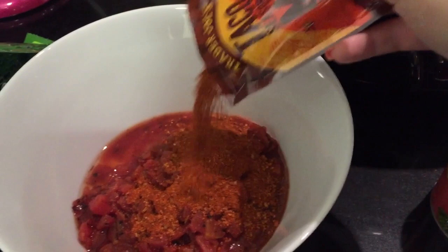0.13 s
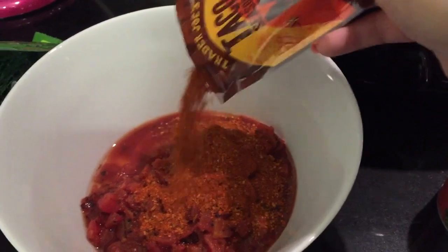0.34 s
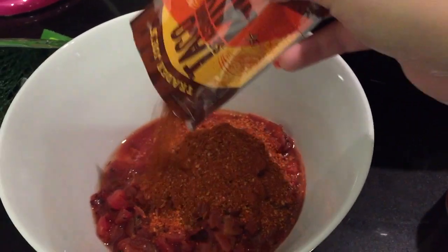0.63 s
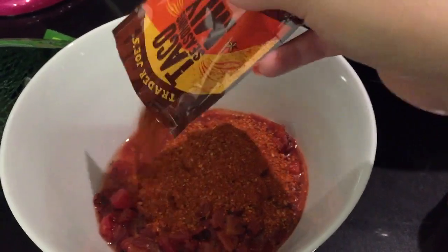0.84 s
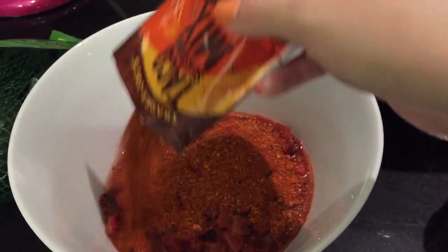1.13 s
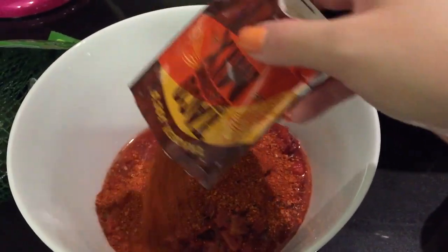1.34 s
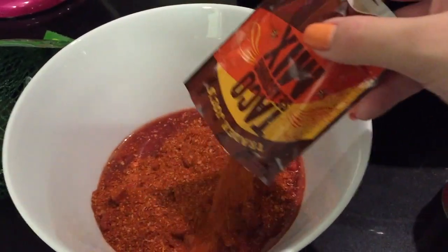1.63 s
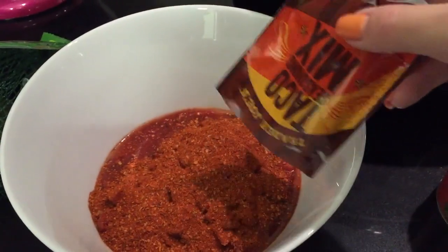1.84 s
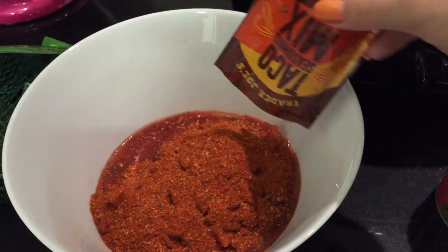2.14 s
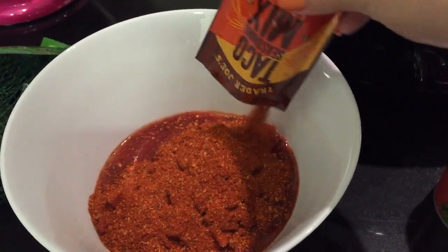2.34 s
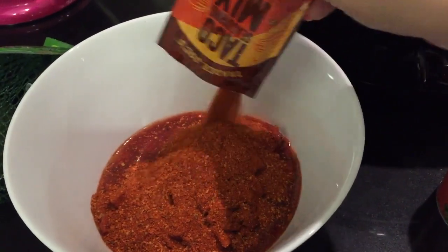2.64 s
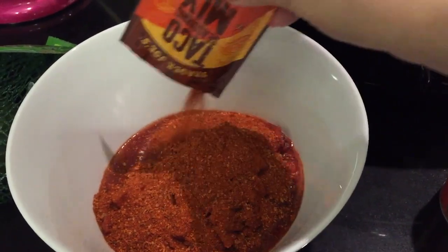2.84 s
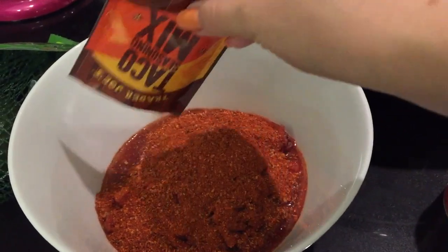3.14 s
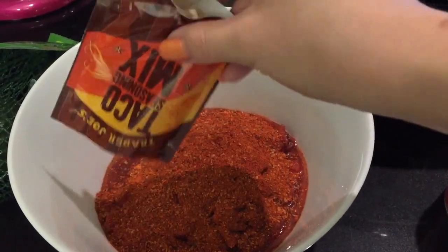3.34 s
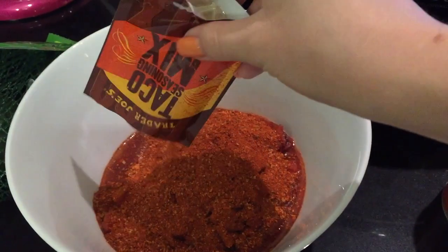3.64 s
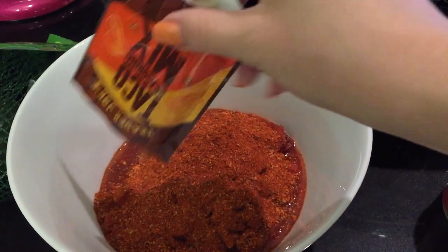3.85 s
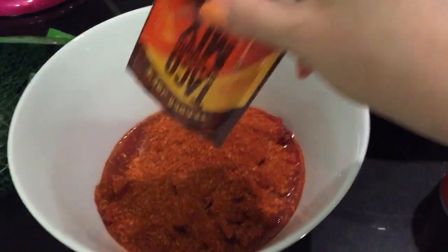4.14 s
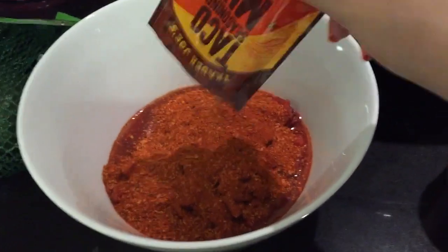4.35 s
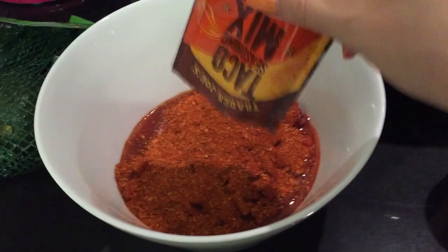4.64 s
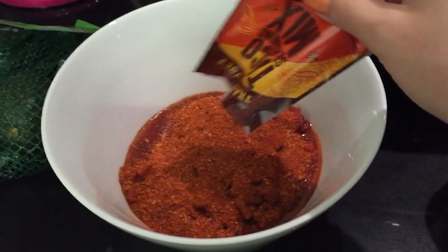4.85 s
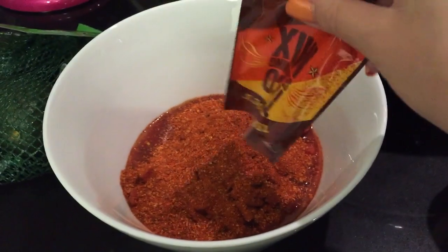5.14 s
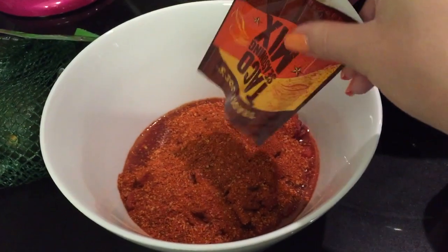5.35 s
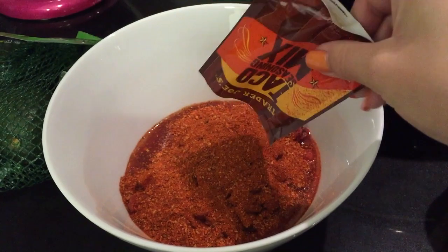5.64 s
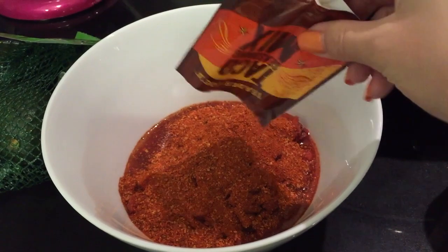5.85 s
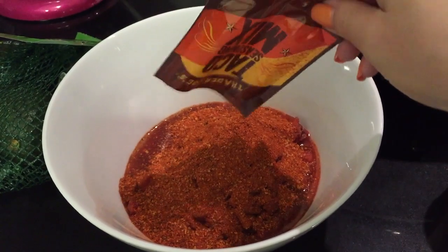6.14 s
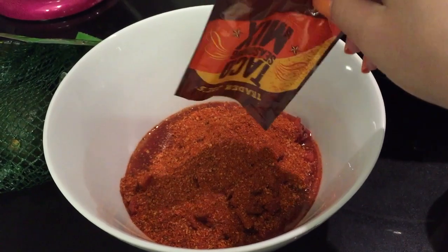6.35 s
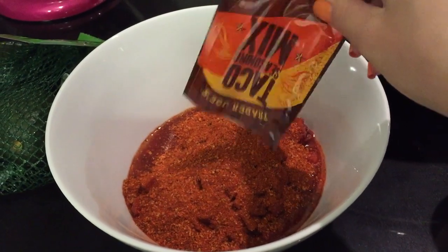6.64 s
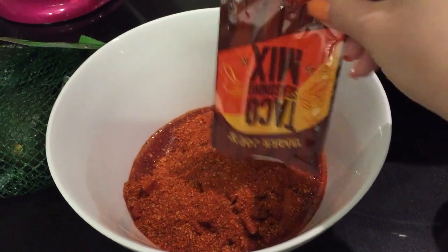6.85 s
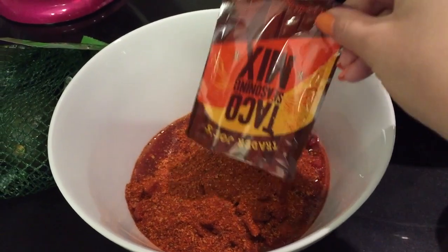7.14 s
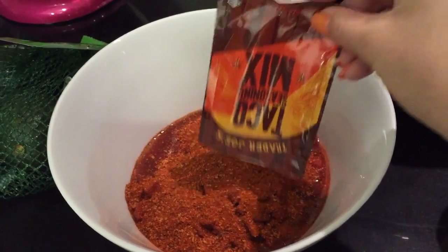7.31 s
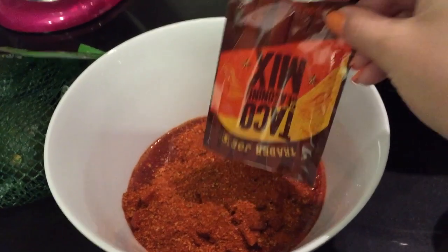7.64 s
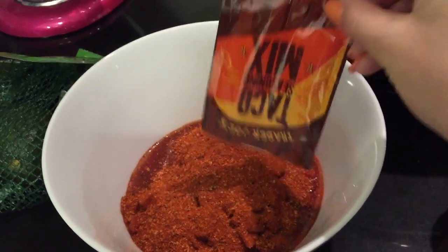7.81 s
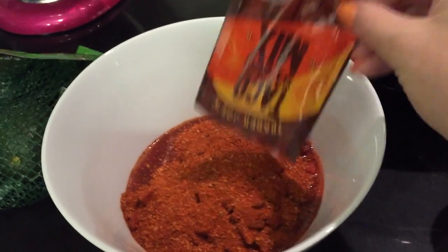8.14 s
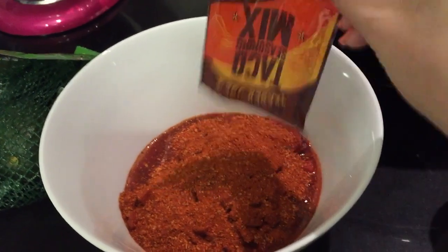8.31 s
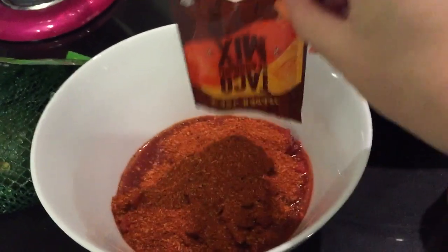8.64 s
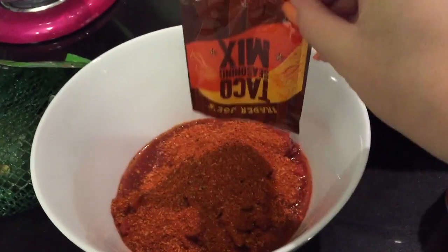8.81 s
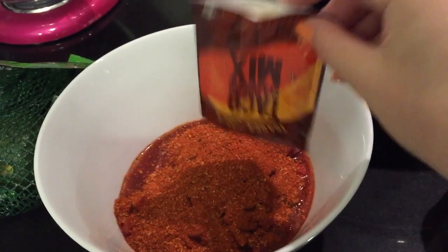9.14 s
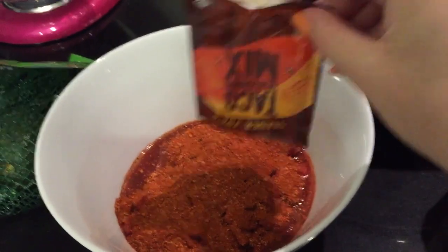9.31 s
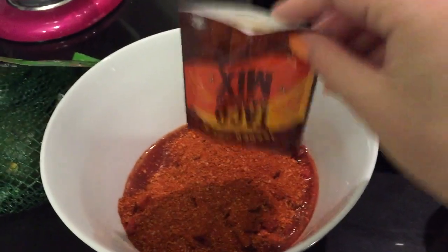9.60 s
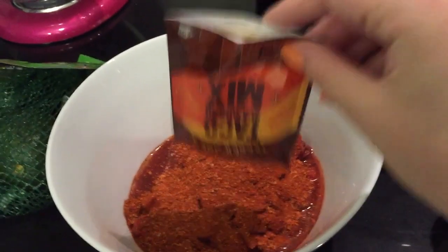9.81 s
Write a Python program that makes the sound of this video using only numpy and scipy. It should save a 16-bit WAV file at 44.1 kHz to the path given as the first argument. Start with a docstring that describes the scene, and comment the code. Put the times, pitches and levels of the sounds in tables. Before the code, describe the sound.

A close, dry kitchen sound over a continuous low, wavering appliance hum with soft air noise. From 0 to about 2.4 s, fine powder hisses out of a foil-lined pouch in short grainy pulses, each starting quickly and thinning, stronger near 1.1 and 2 s. Light film snaps enter around 2 s. At about 2.5 s two hard cracks and a hollow pop accompany the loudest, densest rush of powder, which fades by 3 s. Then only film is heard: crinkling and little ticks at 3 to 4.5 s, a dull snap near 4.05, sharp cracks at 4.9 and 5.0, and a strong cluster of crackles and pops at 5.5 to 5.8. More snaps come at 6.2, 6.4, 6.7 and 7.1 s. Soft low thuds fall near 4.6, 5.4 and 8.4 s. Sparse faint rustles and ticks continue to about 9.4 s, leaving mostly hum.

```python
"""Dry powder hisses in pulses, then in one long rush, over a steady hum; snaps break in from about two
seconds, around the rush; crinkles and ticks then carry on.
A foil-lined pouch of spice mix is shaken out over a china bowl in a small kitchen.
Powder is dense random grains shaped by its flow; film is resonant wrinkles and ringing creases.
Pouch sounds pass through reflections, bowl ring and room tail; a kitchen appliance hums behind."""
import sys
import numpy as np
from scipy import signal
from scipy.fft import rfft, irfft, next_fast_len
from scipy.io import wavfile
from scipy.ndimage import uniform_filter1d

SR = 44100
rng = np.random.default_rng(int(sys.argv[2]) if len(sys.argv) > 2 else 0)


def dump_mix(stems):
    """Bounce the given channels to the path in sys.argv[1] as a 16-bit WAV at rate SR."""
    frames = np.atleast_2d(stems).T  # one column per channel
    limited = np.clip(frames, -1, 1)  # hard clip at full scale
    pcm = np.round(limited * 32767).astype(np.int16)
    wavfile.write(sys.argv[1], SR, pcm)


N = 439677
TIME = np.arange(N) / SR
# spectrum of rustling film: (frequency [Hz], relative level [dB])
FILM_SPECTRUM = [(300, 0), (700, -2), (1300, -6), (2200, -0.5), (3200, 4.5), (4500, 3.5), (6500, -0.5),
                 (9000, -2), (10500, -6.5), (12500, -2.5), (15500, -8.5)]


def from_db(db):
    """Decibels to gain."""
    return 10 ** (np.asarray(db) / 20)


def rms_one(x):
    """Scale to unit rms."""
    return x / np.sqrt(np.mean(x ** 2) + 1e-20)


def at_hz(points, hz):
    """Read a table on a log-frequency axis."""
    f, value = np.transpose(points)
    return np.interp(np.log(hz), np.log(f), value)


def after(s):
    """Seconds since s, zero before it."""
    return np.maximum(TIME - s, 0)


def swell(middle_s, length_s):
    """A smooth bump of height 1, length_s from foot to foot."""
    return np.cos(np.pi * np.clip((TIME - middle_s) / length_s, -.5, .5)) ** 2


def drift(knots_per_s):
    """Random wander of unit rms, straight between random knots."""
    knots = rng.standard_normal(4000)
    return rms_one(np.interp(TIME * knots_per_s, np.arange(len(knots)), knots))


def colour(x, spectrum):
    """Causal minimum-phase filter with the given spectrum, built by folding its cepstrum."""
    size = 2 * next_fast_len(len(x) // 2 + 8192)
    hz = np.maximum(np.arange(size // 2 + 1) * SR / size, 1)
    cepstrum = irfft(np.log(from_db(at_hz(spectrum, hz))))
    cepstrum[1:size // 2] *= 2
    cepstrum[size // 2 + 1:] = 0
    return irfft(rfft(x, size) * np.exp(rfft(cepstrum)))[:len(x)]


def butter(x, order, edge_hz, kind):
    """Butterworth filter."""
    return signal.sosfilt(signal.butter(order, edge_hz, kind, fs=SR, output="sos"), x)


def band(x, low_hz, high_hz):
    """Butterworth band-pass."""
    return butter(x, 3, [low_hz, high_hz], "band")


def resonate(x, hz, width_hz):
    """One two-pole resonance, gain about 1 on top."""
    r = np.exp(-np.pi * width_hz / SR)
    numerator = np.array([1, 0, -1]) * (1 - r * r) / 2
    denominator = [1, -2 * r * np.cos(2 * np.pi * hz / SR), r * r]
    return signal.lfilter(numerator, denominator, x + 1e-18)


def grains(per_s, spread_db):
    """Random clicks of either sign and uneven size, mostly small."""
    sizes = from_db(spread_db * np.minimum(rng.exponential(1, N), 4))
    return (rng.random(N) < per_s / SR) * sizes * rng.choice([-1, 1], N)


def play(x, level_db, treble_db):
    """Give a texture its level in the mids and its brightness above them."""
    low = butter(x, 3, 5900, "low")
    high = butter(x, 3, 5900, "high")
    low = low / np.std(band(low, 2000, 5500))
    high = high / np.std(band(high, 6500, 15000))
    return from_db(level_db) * (low + from_db(treble_db) * high)


def shifting(x, depth_db, knots_per_s, count=22):
    """As the pouch changes shape, overlapping bands of its sound rise and sink, each on its own."""
    size = next_fast_len(N)
    spectrum = rfft(x, size)
    hz = np.arange(len(spectrum)) * SR / size
    place = np.interp(hz, np.geomspace(900, 15000, count), np.arange(count))
    out = 0
    for k in range(count):
        one_band = irfft(spectrum * np.maximum(1 - abs(place - k), 0), size)[:N]
        out = out + one_band * from_db(depth_db * drift(knots_per_s))
    return out


def flow_db():
    """Flow of powder: every slug starts quickly, thins out and stops; the final rush comes on top."""
    # each shake sends a slug down the film: (start [s], length [s], flow before powder_db [dB])
    shakes = [(0.0, 0.012, -70), (0.082, 0.098, -62), (0.27, 0.14, -59.5), (0.363, 0.051, -66),
              (0.501, 0.11, -60.5), (0.696, 0.12, -64), (0.889, 0.15, -60.5), (1.083, 0.11, -54),
              (1.263, 0.16, -56), (1.418, 0.098, -58.5), (1.563, 0.081, -61.5), (1.683, 0.07, -75),
              (1.977, 0.12, -56.5), (2.177, 0.12, -60.5), (2.264, 0.048, -57.5), (2.328, 0.032, -55.5),
              (2.436, 0.062, -43), (2.576, 0.069, -49.5)]
    attack_s, sag_db_per_s, release_db_per_s = 0.053, 58, 192
    slugs = 0
    for s, length_s, db in shakes:
        onset = np.sin(np.pi / 2 * np.minimum(after(s) / attack_s, 1)) ** 2
        sag_db = sag_db_per_s * after(s + attack_s)
        release_db = release_db_per_s * after(s + length_s)
        slugs = slugs + onset * from_db(db - sag_db - release_db)
    # tipped right over, the pouch lets the rest go: it swells, holds and runs dry
    rush_s, hold_s, rush_db = 2.503, 0.195, -48.5
    rise_db_per_s, fall_db_per_s = 116, 89
    rise_db = rise_db_per_s * np.maximum(rush_s - TIME, 0)
    fall_db = fall_db_per_s * after(rush_s + hold_s)
    rush = from_db(rush_db - rise_db - fall_db)
    return 20 * np.log10(np.hypot(slugs, rush) + 1e-9)


def powder():
    """Thousands of tiny grains and a few coarse flakes tick along the film and sound the air in the pouch."""
    # air inside the pouch: (frequency [Hz], width [Hz], gain [dB])
    pouch_air = [(1220, 140, 3.5), (1900, 710, -6), (3080, 310, 3.5)]
    # spectrum of sliding powder: (frequency [Hz], relative level [dB])
    powder_spectrum = [(300, -32), (600, -9.5), (1000, -6.5), (1600, 1), (2400, 1), (3100, 0.5), (4500, 0),
                       (6500, 1.5), (9000, 2), (10500, -2), (12500, -1.5), (15500, -6.5)]
    fine = rms_one(grains(per_s=8000, spread_db=1.5))
    coarse = rms_one(grains(per_s=400, spread_db=3.0))
    ticks = fine + from_db(-5.0) * coarse
    ticks = ticks * from_db(0.41 * drift(130) + 1.2 * drift(34.55))
    flakes = from_db(-4.0) * rms_one(grains(per_s=220, spread_db=2.0))
    drive = 0.75 * ticks + flakes
    hollow = sum(from_db(db) * resonate(drive, hz, width) for hz, width, db in pouch_air)
    sound = shifting(colour(ticks + hollow, powder_spectrum), depth_db=2.5, knots_per_s=40)

    level_db = flow_db()
    # the finest dust runs ahead of each slug, so it starts bright
    fines_lead_s = 0.0072
    fines_db = np.interp(TIME + fines_lead_s, TIME, level_db)
    # a thin trickle is brighter than a thick flow
    trickle_db, trickle_treble_db, treble_db_per_db = -71.5, -2, -0.1
    trickle_tilt_db = trickle_treble_db + treble_db_per_db * (fines_db - trickle_db)
    treble_db = fines_db - level_db + trickle_tilt_db
    # a thick flow lies on the film and damps its low notes
    thick_db, thick_damping, thick_edge_hz = -58, 0.57, 1300
    thickness = np.minimum(from_db(level_db - thick_db), 1)
    lows = butter(sound, 1, thick_edge_hz, "low")
    return play(sound - thick_damping * thickness * lows, level_db, treble_db)


def appliance(waver_db=3.0, phase_waver_rad=0.69, drone_waver_db=3.0, wander_db=0.6):
    """Wavering motor hum, over air noise whose lows and resonances slowly rise and sink."""
    # mains hum: (frequency [Hz], rms level before waver [dB])
    hum_tones = [(59.2, -70.5), (118.8, -59.5), (236.9, -66.5)]
    # room and casing resonances: (frequency [Hz], width [Hz], level before waver and colouring [dB])
    drone_modes = [(55.5, 11, -73), (83.5, 7, -66), (204.2, 7.3, -66), (297.7, 20, -70.5), (400, 33, -80),
                   (455.5, 26, -75), (905.7, 26, -74.5), (1308, 50, -79.5)]
    # air noise spectrum: (frequency [Hz], relative level [dB])
    air_spectrum = [(22, -16.5), (40, -7.5), (58, 4.5), (72, 0.5), (100, 2.5), (140, -7), (175, -9),
                    (222, 3), (265, -6.5), (320, -6.5), (400, -21.5), (600, -21), (950, -20.5), (1200, -27),
                    (2000, -26.5), (3000, -32.5), (6000, -38.5), (15000, -48)]
    air_db = -56.5
    hum = 0
    for hz, db in hum_tones:
        phase = 2 * np.pi * (hz * TIME + rng.random()) + phase_waver_rad * drift(7)
        hum = hum + from_db(db + waver_db * drift(4.5)) * np.sqrt(2) * np.sin(phase)
    drone = 0
    for hz, width, db in drone_modes:
        mode = rms_one(resonate(rng.standard_normal(N), hz, width))
        drone = drone + from_db(db + drone_waver_db * drift(11)) * mode
    drone = colour(drone, [(25, -9.5), (50, -2.5), (1400, 0.0), (3000, -10.0)])
    air = from_db(air_db) * rms_one(colour(rng.standard_normal(N), air_spectrum))
    lows = butter(air, 1, 1200, "low")
    return hum + air - lows + (drone + lows) * from_db(wander_db * drift(8))


def rubs():
    """Short swells of band-limited noise: soft rubs and scrapes, some narrow enough to squeak."""
    # (middle [s], length [s], centre [Hz], width [Hz], level [dB])
    swells = [(0.402, 0.12, 3200, 1100, -60), (1.439, 0.046, 3800, 500, -58),
              (1.958, 0.056, 1920, 900, -56.5), (4.043, 0.012, 2500, 2500, -55),
              (4.105, 0.27, 2090, 1200, -68), (3.259, 0.089, 3750, 900, -66), (3.82, 0.22, 3020, 700, -69),
              (4.185, .07, 3880, 1200, -67), (4.5, 0.098, 6240, 60, -74), (4.558, .025, 7350, 250, -71),
              (5.174, 0.051, 3850, 400, -66), (6.39, 0.09, 895, 600, -66), (8.36, 0.033, 4380, 700, -64),
              (8.616, 0.031, 4760, 600, -63), (9.142, 0.048, 890, 700, -64), (9.367, 0.052, 4500, 900, -61)]
    noise = rng.standard_normal(N)
    out = 0
    for s, length_s, hz, width, db in swells:
        narrowed = rms_one(resonate(resonate(noise, hz, width), hz, width))
        out = out + from_db(db) * swell(s, length_s) * narrowed
    return out


def ripple_db(x, hz, bins=15):
    """Broad humps and hollows in the spectrum of a short sound, around their mean."""
    power = uniform_filter1d(abs(rfft(x)) ** 2, bins)
    level = 10 * np.log10(np.interp(hz, np.arange(len(power)) * SR / len(x), power) + 1e-9)
    return np.clip(level - level.mean(), -10, 10)


def snaps(damping=0.41, gain_db=-1.5, peak_db=11.0, second_db=6.5, peak_octaves=0.12,
          edge_db_per_octave=15.5, crack_db=-1.5, buckle_s=0.00044, count=320):
    """A crease cracks and rings many film modes, strongest at its fold's two pitches, weak below its lowest."""
    # (time [s], level before gain_db [dB], treble re level [dB], t60 at 3 kHz [s],
    #  main pitch [Hz], second pitch [Hz], lowest pitch of the fold [Hz])
    creases = [(1.9804, -48.5, -26, 0.032, 1710, 2240, 900), (2.062, -56, 6, 0.03, 5940, 12000, 3000),
               (2.366, -51.5, -2, 0.028, 3300, 1900, 1200), (2.403, -54, -4, .018, 3200, 5200, 1500),
               (2.427, -51.5, -3, .018, 3200, 2210, 1500), (2.4826, -31.5, -6.5, 0.0053, 3100, 3850, 1790),
               (2.516, -31.5, -5, .019, 2000, 2720, 600), (2.89, -56.5, 3, 0.025, 4800, 3240, 2000),
               (3.11, -57.5, -21, 0.021, 1810, 3530, 1300), (3.1604, -56.5, -2, 0.0062, 5270, 6000, 3000),
               (3.5045, -45, 1, 0.0059, 2920, 2450, 700), (3.482, -59, -9, .015, 3300, 2600, 2000),
               (3.547, -57, -1, .025, 2900, 6000, 2200), (3.566, -51.5, -7, 0.015, 3080, 7000, 2200),
               (3.634, -58, -3, 0.0061, 4340, 3040, 2200), (3.6912, -55, -5.5, 0.023, 3100, 4200, 2400),
               (3.823, -56.5, -4, .016, 3100, 4200, 2400), (3.849, -58, -5, 0.018, 3020, 4400, 2400),
               (4.046, -38, -16.5, 0.011, 2820, 2180, 500), (4.0625, -55, -14, .025, 2900, 2200, 1500),
               (4.124, -58, -11, 0.0097, 2900, 4800, 2000), (4.2023, -56.5, -10, 0.024, 3100, 4000, 2600),
               (4.226, -58, -11, .022, 3100, 4000, 2600), (4.2465, -60, -8, .016, 3100, 4400, 2600),
               (4.264, -59, 6.5, 0.023, 4300, 8640, 2500), (4.299, -52, -5, 0.038, 3380, 2680, 2000),
               (4.626, -60.5, -5, 0.034, 2980, 4460, 2200), (4.649, -61, -10, 0.026, 3100, 4500, 2200),
               (4.91, -33, 1.5, .005, 2710, 4170, 1590), (4.928, -43, -2, 0.0094, 4130, 2300, 1200),
               (5.0014, -39.5, 1.5, 0.005, 3900, 6400, 3100),
               (5.247, -46.5, 3.5, 0.0042, 6200, 12000, 4020), (5.542, -44, -2, 0.013, 1190, 3100, 700),
               (5.5696, -31, 2, 0.012, 2190, 3080, 400), (5.5712, -32.5, -6, 0.015, 1140, 3080, 400),
               (5.574, -37, 5, .006, 7500, 8850, 2000), (5.586, -30, -7.5, 0.0075, 4300, 1210, 443),
               (5.614, -33.5, -5.5, 0.01, 2200, 3470, 910), (5.595, -53, -13.5, .012, 2000, 4200, 700),
               (5.6396, -51, -13, .012, 3600, 2000, 1200), (5.677, -58, -2, 0.0092, 3800, 6000, 2000),
               (5.711, -52, -5, .017, 3050, 5500, 2000), (5.7633, -38.5, -9, 0.011, 3530, 4300, 1184),
               (5.7628, -39, 3.5, 0.0036, 6200, 5570, 3040), (5.9221, -53.5, -13, 0.017, 1220, 2500, 700),
               (6.129, -58.5, 7.5, .012, 3740, 5770, 3020), (6.219, -32, -10, 0.0092, 3860, 2440, 700),
               (6.283, -49.5, 12, 0.016, 12900, 5570, 2000), (6.3955, -49, -11, 0.012, 1100, 3260, 800),
               (6.4234, -39.5, -15, 0.015, 1160, 2060, 550), (6.7, -44.5, -26, .011, 2200, 3460, 650),
               (6.8535, -59, 0.5, 0.034, 4100, 6000, 3000), (6.9407, -47, -12, 0.0068, 2240, 1400, 700),
               (7.103, -45.5, -16, 0.015, 3500, 1750, 600), (8.424, -59, -7, 0.04, 4200, 6030, 3000),
               (8.852, -68, 8.5, 0.022, 6040, 4000, 3000), (8.878, -67, 6, .035, 3600, 6030, 3000)]
    # spectrum of a snapping crease: (frequency [Hz], relative level [dB])
    crease_spectrum = [(200, 9), (300, 0), (430, 4), (700, 5), (1000, 7), (1500, 7), (2200, 7), (3400, 8.5),
                       (5000, 2.5), (6500, -1), (9000, -1), (10600, -7), (12500, -7.5), (15500, -14)]
    t = np.arange(int(.06 * SR)) / SR
    grid_hz = np.geomspace(100, 16000, 150)
    attack = int(.008 * SR)
    out = np.zeros(N + len(t))
    for s, level_db, treble_db, t60, pitch, second, lowest in creases:
        # modes lie closer together in the bass; the high ones die first
        hz = 220 + 15300 * ((np.arange(count) + rng.random(count)) / count) ** 1.7
        life_s = max(t60, .002) * (3000 / hz) ** damping
        strength = np.sqrt(np.gradient(hz) / life_s) * rng.choice([-1, 1], count)
        modes = np.sin(2 * np.pi * hz[:, None] * t) * from_db(-60 * t / life_s[:, None])
        ring = (strength[:, None] * modes).sum(0) * (1 - np.exp(-t / buckle_s))
        burst = ring / np.linalg.norm(ring) + from_db(crack_db) * (t == 0)

        fold_db = at_hz(crease_spectrum, grid_hz)
        for f, db in ((pitch, peak_db), (second, second_db)):
            fold_db = fold_db + db * np.exp(-.5 * (np.log2(grid_hz / f) / peak_octaves) ** 2)
        fold_db = fold_db - edge_db_per_octave * np.maximum(np.log2(lowest / grid_hz), 0)
        # even out the random ripple of the modes
        snap = colour(burst, np.column_stack([grid_hz, fold_db - ripple_db(burst, grid_hz)]))

        body, mids, treble = band(snap, 150, 5800), band(snap, 1500, 5800), band(snap, 5800, 16000)
        snap = body / np.std(mids[:attack]) + from_db(treble_db) * treble / np.std(treble[:attack])
        start = int(s * SR)
        out[start:start + len(t)] += from_db(level_db + gain_db) * snap
    return out[:N]


def knocks(rise_s=0.0005):
    """A whole panel of the pouch pops over and swings a few times at its own low pitch."""
    # (time [s], pitch [Hz], t60 [s], level before the rise [dB])
    panels = [(2.517, 1050, .02, -24.5), (2.5175, 470, 0.029, -34.5), (2.518, 333, 0.034, -35),
              (4.911, 260, .025, -43), (5.570, 284, 0.039, -34.5), (5.571, 420, 0.03, -34.5),
              (5.5865, 540, 0.028, -34.5), (5.6145, 470, .02, -45), (5.7628, 906, 0.013, -31),
              (6.2195, 1010, 0.012, -43), (6.941, 447, .02, -48), (7.1025, 1200, 0.017, -32)]
    out = 0
    for s, hz, t60, db in panels:
        decay = from_db(db - 60 * np.minimum(after(s) / t60, 4))
        rise = 1 - np.exp(-after(s) / rise_s)
        out = out + decay * rise * np.sin(2 * np.pi * hz * after(s))
    return out


def flexing_db():
    """Level and brightness of the rustle: each flex swells smoothly out of a faint, uneven rustle."""
    # faint, uneven rustle of the film in the hand: (time [s], level before crinkle_db [dB])
    handling = [(2.9, -97), (3.1, -69.5), (3.36, -75.5), (3.6, -62.5), (3.72, -71.5), (3.85, -66),
                (4.02, -72.5), (4.2, -72.5), (4.35, -70), (4.52, -75), (4.78, -72.5), (4.97, -63.5),
                (5.2, -67), (5.45, -68.5), (5.75, -62.5), (5.9, -67), (6.35, -71), (6.5, -77),
                (6.95, -68.5), (7.4, -90), (8.6, -82.5), (9.9, -89)]
    handling_treble_db = -2
    # the fingers flex the film:
    # (middle [s], length [s], level before crinkle_db [dB], treble re level [dB])
    flexes = [(3.046, 0.085, -56, -5.5), (3.188, 0.11, -58.5, -4), (3.32, 0.019, -65, 7),
              (3.51, 0.13, -54.5, -5), (3.59, 0.091, -66, -2), (3.828, 0.21, -59.5, 0),
              (3.914, 0.12, -60, 0), (4.001, 0.02, -62, 1), (4.277, 0.14, -57, -4), (4.39, 0.053, -55, 4),
              (4.565, 0.049, -69, 5), (4.903, 0.26, -53.5, -8.5), (4.99, 0.035, -59, -5),
              (5.103, 0.035, -65, 6), (5.34, 0.072, -66, 3), (5.62, 0.31, -50, -3.5),
              (5.807, 0.26, -62.5, -2), (6.02, 0.27, -67.5, 7.5), (6.125, 0.034, -65, 4),
              (6.202, 0.021, -69, -6), (6.278, 0.18, -59, -5), (6.41, 0.1, -59.5, -1),
              (6.687, 0.12, -61.5, -0.5), (6.91, 0.1, -67, -3), (7.12, 0.047, -59, -3),
              (7.174, 0.054, -67.5, -1), (7.321, 0.058, -68.5, 2), (7.583, 0.061, -78, 11),
              (8.046, 0.042, -62, 4.5), (8.362, .04, -60, -1.5), (8.462, 0.18, -66, 6.5),
              (8.57, 0.036, -66.5, -1), (8.625, 0.094, -65, 8), (8.835, 0.28, -73.5, 1),
              (9.095, 0.04, -74, -1), (9.261, 0.033, -75, 2), (9.38, 0.077, -63, 4)]
    handling_db = np.interp(TIME, *np.transpose(handling))
    mids = from_db(handling_db) ** 2
    treble = from_db(handling_db + handling_treble_db) ** 2
    for s, length_s, db, treble_db in flexes:
        power = from_db(db) ** 2 * swell(s, length_s) ** 2
        mids = mids + power
        treble = treble + power * from_db(treble_db) ** 2
    return 10 * np.log10(mids), 10 * np.log10(treble / mids)


def crinkle(clump_db=1.3, cycles=13.1, rub_db=-1.5, tick_db=0.0, count=24):
    """Wrinkles give way in clumps, each ringing at its own pitch, with dry ticks and the rub of film on film."""
    clicks = grains(per_s=1500, spread_db=1.0)
    dealt = rng.integers(0, count, N)  # which pitch each click rings
    pitches_hz = np.linspace(1000, 15000, count)
    widths_hz = pitches_hz / cycles + 250
    wrinkles = 0
    for k in range(count):
        ring = resonate(clicks * (dealt == k), pitches_hz[k], widths_hz[k])
        wrinkles = wrinkles + ring / np.sqrt(widths_hz[k])
    # a tick sets the whole sheet shivering for about a millisecond
    shiver = rng.standard_normal(200) * np.exp(-np.arange(200) / 22)
    ticks = rms_one(np.convolve(grains(per_s=140, spread_db=2.5), shiver)[:N])
    rub = from_db(rub_db) * rng.standard_normal(N)
    texture = rms_one(wrinkles) + rub + from_db(tick_db) * ticks
    clumped = texture * from_db(clump_db * drift(160))
    film = shifting(colour(clumped, FILM_SPECTRUM), depth_db=3.0, knots_per_s=45)
    level_db, treble_db = flexing_db()
    return play(film, level_db, treble_db)


def dry_ticks(gain_db=-4.5, t60=0.0074, low_hz=3000):
    """A single wrinkle flips and the sheet shivers for a moment: a short decaying noise burst."""
    # ticks that stand out of the rustle: (time [s], level before gain_db and filters [dB])
    flips = [(3.042, -59), (3.317, -59), (3.455, -56), (3.487, -56), (3.576, -45.5), (3.758, -52.5),
             (3.877, -50), (3.905, -53), (4.0803, -54), (4.3825, -49), (4.556, -57), (4.992, -47),
             (5.0747, -52), (5.098, -52), (5.226, -58), (5.945, -55), (6.013, -52), (6.198, -51),
             (6.382, -57), (6.915, -54), (7.122, -63), (7.176, -62), (7.319, -61), (7.573, -64),
             (8.026, -56), (8.042, -54), (8.352, -55), (8.474, -53), (8.600, -63), (8.6155, -52),
             (8.818, -58), (8.8973, -54), (9.077, -59), (9.098, -56.5), (9.358, -58)]
    t = np.arange(int(.008 * SR)) / SR
    out = np.zeros(N + len(t))
    for s, db in flips:
        burst = rms_one(rng.standard_normal(len(t)) * from_db(-60 * t / t60))
        start = int(s * SR)
        out[start:start + len(t)] += from_db(db + gain_db) * burst
    return butter(colour(out[:N], FILM_SPECTRUM), 2, low_hz, "high")


def thuds():
    """Soft low thuds: a few slow cycles under a smooth swell."""
    # (middle [s], length [s], pitch [Hz], rms level at the middle [dB])
    bumps = [(4.6, 0.16, 54, -49), (5.422, 0.12, 51.2, -48), (8.366, 0.037, 221, -50.5)]
    out = 0
    for s, length_s, hz, db in bumps:
        out = out + from_db(db) * swell(s, length_s) * np.sqrt(2) * np.sin(2 * np.pi * hz * TIME)
    return out


def surroundings(x, near_db=-9.0, near_t60=0.024, room_db=-12.5):
    """Quick reflections from bowl and counter, the bowl ringing in sympathy, then the kitchen's tail."""
    # bowl modes: (frequency [Hz], response amplitude [dB], t60 [s])
    bowl_modes = [(1145, -78, .45), (1191, -68.5, 0.48), (2257, -71.5, 0.36), (3270, -73, 0.26),
                  (4400, -73, 0.282)]
    # kitchen reverberation: (frequency [Hz], t60 [s])
    kitchen_t60 = [(200, 0.3), (1500, 0.14), (5000, 0.077), (15000, 0.094)]
    t = np.arange(SR // 2) / SR
    arrived = t > .002
    near = rng.standard_normal(len(t)) * from_db(-60 * t / near_t60) * arrived
    near = colour(near, [(200, -1.5), (3500, -4.5), (7000, -9.5), (15000, -3.5)])
    edges_hz = np.geomspace(150, 16000, 8)
    tail = 0
    for low, high in zip(edges_hz, edges_hz[1:]):
        t60 = at_hz(kitchen_t60, np.sqrt(low * high))
        tail = tail + band(rng.standard_normal(len(t)), low, high) * from_db(-60 * t / t60)
    tail = tail * arrived
    bowl = 0
    for hz, db, t60 in bowl_modes:
        bowl = bowl + from_db(db) * np.sin(2 * np.pi * hz * t) * from_db(-60 * t / t60)
    near = from_db(near_db) * near / np.linalg.norm(near)
    tail = from_db(room_db) * tail / np.linalg.norm(tail)
    return x + signal.fftconvolve(x, near + tail + bowl)[:N]


def scene(powder_db=-0.5, crinkle_db=-3.5):
    """The powder runs out after about three seconds; from then on the film itself is heard."""
    pouch = from_db(powder_db) * powder() + rubs() + snaps() + knocks()
    pouch = pouch + from_db(crinkle_db) * crinkle() + dry_ticks()
    return (surroundings(pouch) + appliance() + thuds())[None]


def record(dry):
    """The top is cut steeply by an elliptic low-pass."""
    cutoff_hz = 15450
    return signal.sosfilt(signal.ellip(10, .2, 80, cutoff_hz, fs=SR, output="sos"), dry)


dry = scene()
out = record(dry)
dump_mix(out)
```